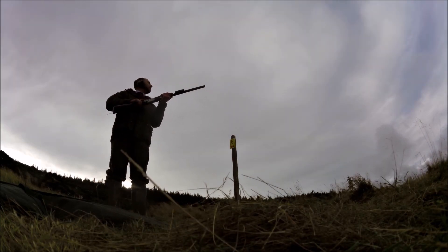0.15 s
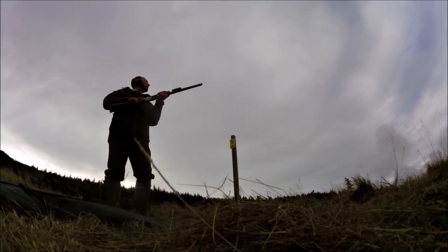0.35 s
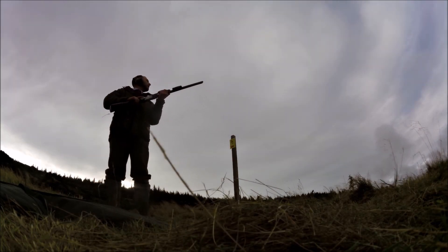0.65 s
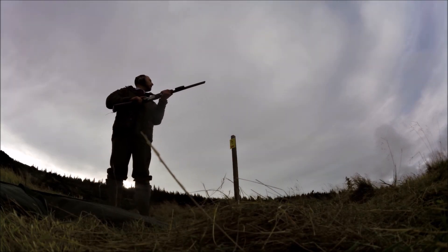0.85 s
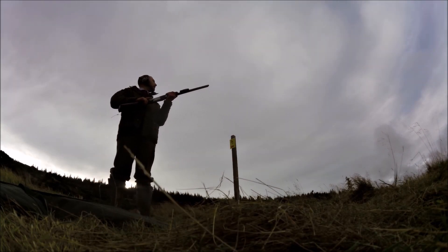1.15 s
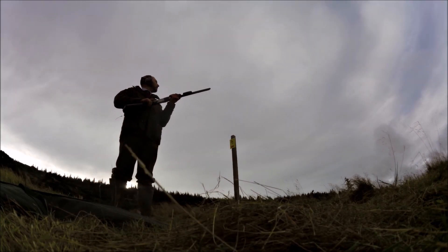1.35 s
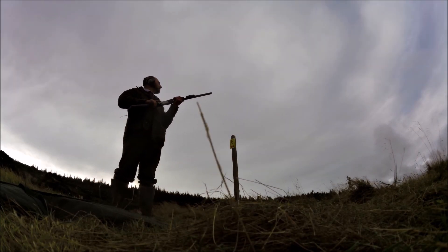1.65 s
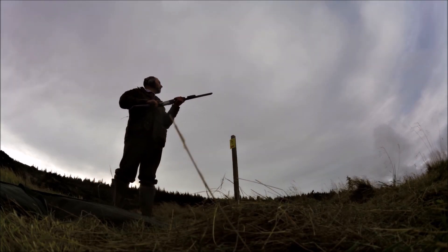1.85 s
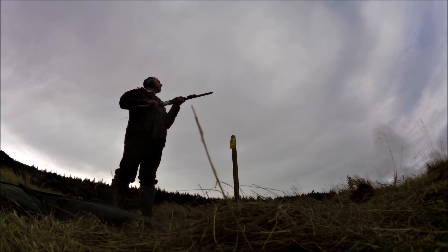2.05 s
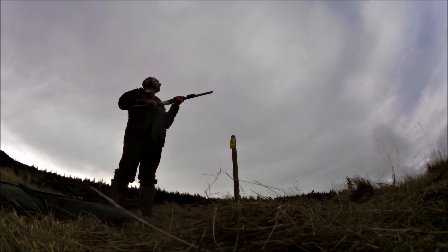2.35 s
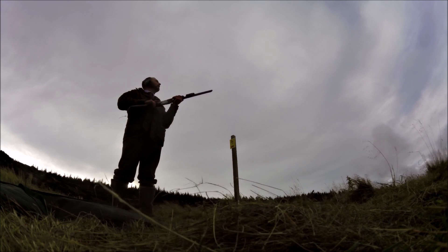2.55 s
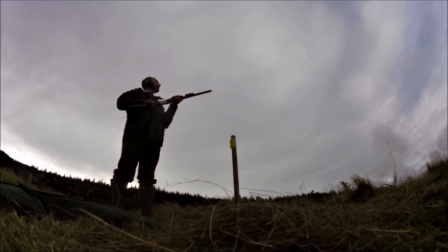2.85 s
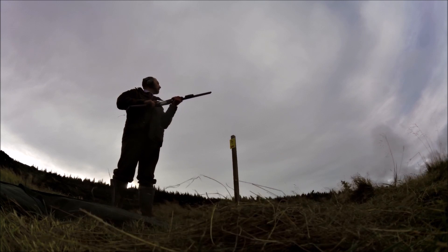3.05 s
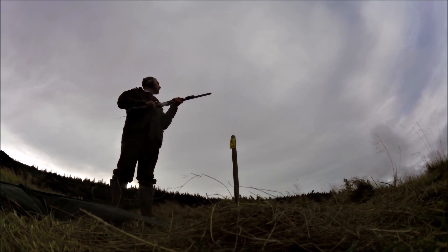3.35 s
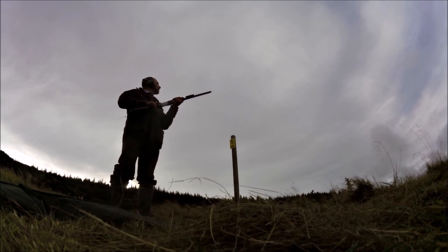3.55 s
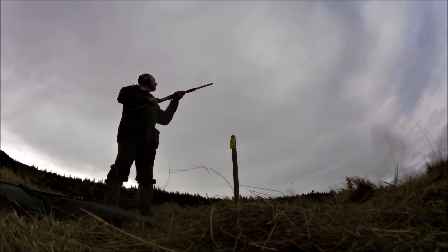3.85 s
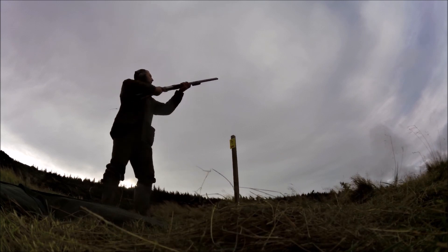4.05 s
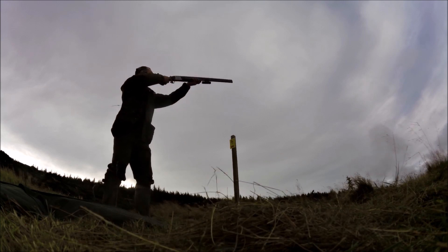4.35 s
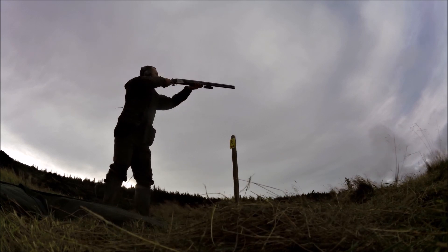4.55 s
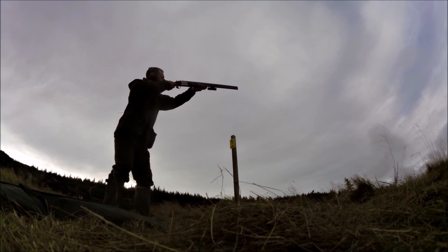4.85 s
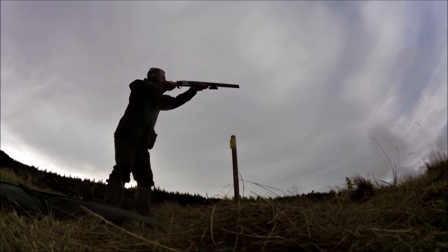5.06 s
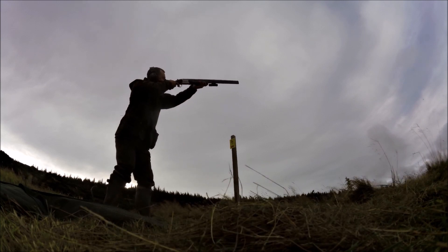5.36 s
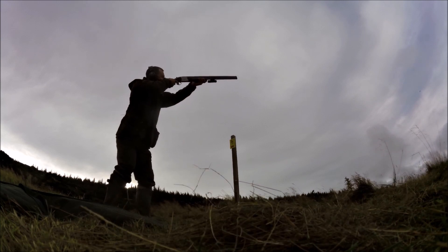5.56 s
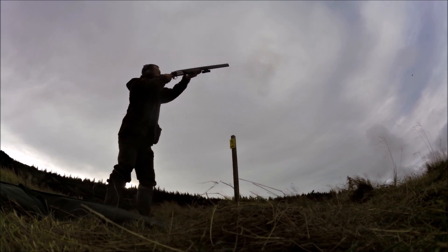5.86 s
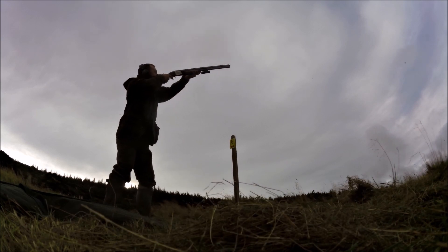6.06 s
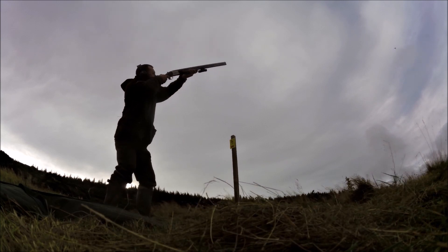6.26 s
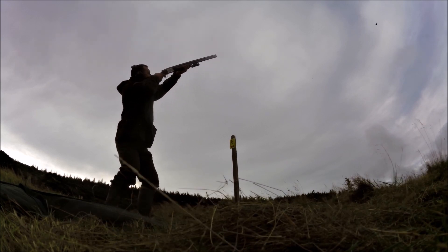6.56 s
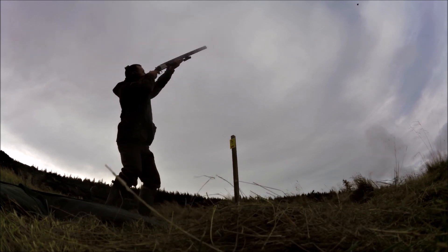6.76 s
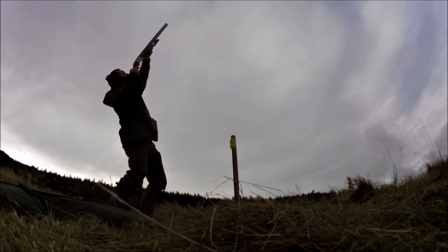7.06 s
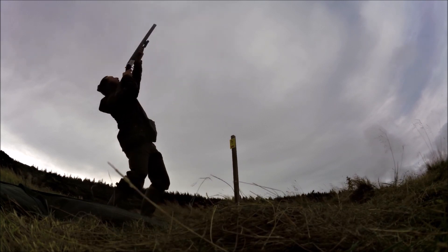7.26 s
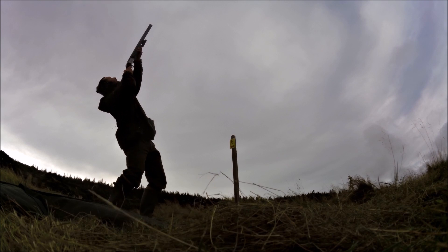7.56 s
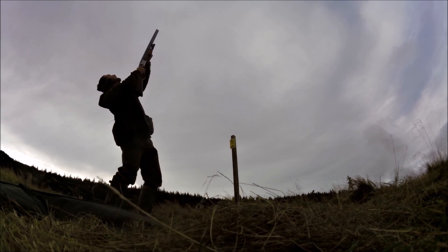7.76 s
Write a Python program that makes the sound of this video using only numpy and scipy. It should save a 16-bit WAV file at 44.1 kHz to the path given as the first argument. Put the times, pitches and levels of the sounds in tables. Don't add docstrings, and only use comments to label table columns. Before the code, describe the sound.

Wind thumps on a small microphone, then a dozen shotgun blasts fire in an uneven string on an open hillside, two very close and distorted.

```python
import sys
import numpy as np
from scipy import signal
from scipy.fft import rfft, irfft
from scipy.io import wavfile

SR = 44100
rng = np.random.default_rng(int(sys.argv[2]) if len(sys.argv) > 2 else 0)


def put_to_file(sound):
    columns = np.atleast_2d(sound).T
    safe = np.clip(columns, -1, 1)
    whole_steps = np.round(safe * 32767)
    wavfile.write(sys.argv[1], SR, whole_steps.astype(np.int16))


def convert_level_to_amplitude(level_db):
    exponent = np.asarray(level_db, float) / 20
    return 10 ** exponent


N = 348831
STEP = 32


def coloured(x, points):
    hz, level_db = np.transpose(points)
    grid_hz = np.maximum(np.arange(N // 2 + 1) * SR / N, 1)
    gain_db = np.interp(np.log(grid_hz), np.log(hz), level_db)
    y = irfft(rfft(x) * convert_level_to_amplitude(gain_db), N)
    return y / np.std(y)


def drift(rate_hz):
    r = np.exp(-2 * np.pi * rate_hz / SR)
    slow = signal.lfilter([1], [1, -2 * r, r * r], rng.standard_normal(N + SR))[SR:]
    return slow / np.std(slow)


def resonance(x, hz, width_hz):
    r = np.exp(-np.pi * width_hz / SR)
    zeros = np.array([1, 0, -1]) * (1 - r * r) / 2
    poles = [1, -2 * r * np.cos(2 * np.pi * hz / SR), r * r]
    return signal.lfilter(zeros, poles, x)


def narrow(x, hz, width_hz):
    return resonance(resonance(x, hz, width_hz), hz, width_hz)


def cut(x, hz, kind, order=2):
    return signal.sosfilt(signal.butter(order, hz, kind, fs=SR, output="sos"), x)


def add(out, at_s, piece):
    i = round(at_s * SR)
    out[i:i + len(piece)] += piece[:N - i]


def dying(noise, t60_s, rise_ms=0.35):
    t = np.arange(len(noise)) / SR
    return noise * (1 - np.exp(-1000 * t / rise_ms)) * convert_level_to_amplitude(-60 * t / t60_s)


def per_sample(power):
    return np.sqrt(np.interp(np.arange(N) / STEP, np.arange(len(power)), power))


def blast(length_ms):
    t = np.arange(SR // 20) / SR / (length_ms / 1000)
    return -(1 - t) * np.exp(-t)


# start_s, blast_db, blast_length_ms, crack_ahead_ms, crack_db
SHOTS = [(1.9825, 4.9, 1.03, 1.59, -5.6), (2.9596, -3.3, 2.26, 1.28, -10.5),
         (3.1916, -4.5, 0.56, 1.83, -4.3), (4.2382, -4.6, 0.55, 2.0, -3.6), (4.4562, 1.5, 0.3, 1.02, -30),
         (5.0475, -0.9, 1.32, 2.52, -0.7), (5.7245, -13.4, 0.73, 1.5, -0.9),
         (5.9082, -4.9, 0.4, 1.38, -11.6), (5.9345, 13.6, 0.55, 1.08, 10.6),
         (6.1579, -6.0, 1.75, 1.65, -10.0), (7.0613, 11.0, 0.51, 1.34, -2.5),
         (7.4077, -8.5, 0.96, 1.28, -8.1)]
# air_and_ground_cut_hz, bounce_after_ms, bounce_db, swing_db, swing_hz
GROUND = [(650, 7.19, -20.5, -0.1, 167), (1560, 1.99, 0.2, 10.5, 106), (2150, 5.61, -20.9, -1.7, 124),
          (2090, 5.5, -16.1, -1.6, 117), (500, 3.3, -2.1, -12.3, 111), (580, 3.36, -10.7, -7.2, 104),
          (1990, 2.01, -6.4, 3.9, 90), (850, 2.85, -10.5, -12.0, 92), (730, 7.37, -12.0, -3.3, 163),
          (1680, 6.08, -11.6, 8.8, 153), (3400, 3.94, -4.9, -3.2, 171), (1880, 1.61, -15.3, 4.8, 147)]


def pressure_fronts():
    out = np.zeros(N)
    t = np.arange(SR // 10) / SR
    swing_rise_s, swing_t60_s = .003, .04
    swell = (1 - np.exp(-t / swing_rise_s)) * convert_level_to_amplitude(-60 * t / swing_t60_s - 5)
    for shot, ground in zip(SHOTS, GROUND):
        start_s, blast_db, length_ms, ahead_ms, crack_db = shot
        air_hz, bounce_ms, bounce_db, swing_db, swing_hz = ground
        fronts = [(-ahead_ms, crack_db, .53), (0, 0, 1), (bounce_ms, bounce_db, 1.55)]
        for after_ms, level_db, stretch in fronts:
            front = cut(blast(stretch * length_ms), air_hz, "low")
            add(out, start_s + after_ms / 1000, convert_level_to_amplitude(blast_db + level_db) * front)
        add(out, start_s, convert_level_to_amplitude(blast_db + swing_db) * swell * np.sin(2 * np.pi * swing_hz * t))
    return out


# boom_db, grass_db, grass_t60_s, bank_after_ms, bank_db
SURROUNDS = [(-25.5, -2, 0.078, 11.5, -14), (-24, -8.5, 0.079, 7.8, -12.5), (-27.5, -11.5, 0.061, 7.3, -19),
             (-28.5, -15, 0.086, 10, -26), (-22.5, -14.5, 0.1, 14, -30), (-22.5, -14.5, 0.062, 7, -24),
             (-33, -22.5, 0.13, 3.7, -21.5), (-39.5, -17, 0.034, 13, -23), (-3.5, 1, 0.13, 5.3, 7.5),
             (-19.5, -15.5, 0.083, 13, -49), (-7, -3.5, 0.16, 5.3, 5), (-26.5, -9, 0.046, 11, -27)]


def booms():
    out = np.zeros(N)
    t = np.arange(SR // 10) / SR
    boom_hz, boom_t60_s = 81, 0.08
    for shot, around in zip(SHOTS, SURROUNDS):
        add(out, shot[0] + 0.0032, convert_level_to_amplitude(around[0] - 60 * t / boom_t60_s) * np.sin(2 * np.pi * boom_hz * t))
    return out


def near_scatter():
    out = np.zeros(N)
    split_hz, treble_share = 1050, 0.32
    noise = rng.standard_normal((len(SHOTS), 2, SR // 2))
    for shot, around, (grass, bank) in zip(SHOTS, SURROUNDS, noise):
        _, grass_db, t60_s, bank_ms, bank_db = around
        low = dying(cut(grass, split_hz, "low"), t60_s)
        high = dying(cut(grass, split_hz, "high"), treble_share * t60_s)
        add(out, shot[0] + 0.002, convert_level_to_amplitude(grass_db) * (low + high))
        add(out, shot[0] + bank_ms / 1000, convert_level_to_amplitude(bank_db) * dying(bank, 0.049))
    return out


# start_s, level_db
THUDS = [
    (5.9312, -15),
    (7.0568, -15),
]


def thuds():
    out = np.zeros(N)
    for start_s, level_db in THUDS:
        knock = blast(1.0) + dying(rng.standard_normal(SR // 20), 0.0058)
        add(out, start_s, convert_level_to_amplitude(level_db) * cut(knock, 3900, "low"))
    return out


# start_s, peak_db, t60_s, cut_hz
SLAPS = [(2.063, -19.5, 0.042, 2190), (2.114, -27.5, 0.068, 2500), (2.126, -17, 0.041, 900),
         (3.164, -32, 0.032, 1200), (3.291, -29, 0.042, 2210), (3.351, -25, 0.045, 604),
         (4.634, -24, 0.087, 1000), (4.673, -19, 0.025, 1300), (4.820, -25, 0.037, 1500),
         (6.044, -29, 0.061, 2220), (7.235, -24, 0.05, 1300), (7.474, -24.5, 0.045, 1480),
         (7.532, -24.5, 0.18, 1830)]


def slaps():
    out = np.zeros(N)
    for start_s, peak_db, t60_s, cut_hz in SLAPS:
        slap = dying(rng.standard_normal(SR // 5), t60_s, rise_ms=3.3)
        add(out, start_s, convert_level_to_amplitude(peak_db + 5) * cut(slap, cut_hz, "low"))
    return out


# centre_hz, width_hz, level_db
BOX = [
    (462, 308, 5.4),
    (1330, 120, -6),
    (2200, 260, 0),
]


def shots():
    direct = pressure_fronts() + booms() + thuds()
    scatter = near_scatter() + slaps()
    scatter = cut(scatter, 467, "low", order=1)
    scatter = cut(cut(scatter, 3500, "low"), 89, "high")
    heard = direct + scatter
    ringing = sum(convert_level_to_amplitude(level_db) * resonance(heard, hz, width_hz) for hz, width_hz, level_db in BOX)
    return cut(.6 * heard + ringing, 3800, "low")


# start_s, level_db, pitch_hz
SNAPS = [(1.983, -9.5, 1420), (1.981, -16, 2500), (2.959, -14.5, 2560), (3.192, -31, 4260),
         (4.237, -29.5, 4050), (5.046, -14.5, 1360), (5.046, -39, 2300), (5.908, -23, 2120),
         (5.907, -43, 3960), (5.933, -0.5, 3000), (6.158, -21, 1090), (6.157, -14, 2000), (7.060, 0, 2845),
         (7.061, 2.5, 1125), (5.936, 9, 1100), (2.960, -9.5, 1040)]


def snaps():
    out = np.zeros(N)
    for start_s, level_db, pitch_hz in SNAPS:
        burst = dying(np.sign(rng.standard_normal(SR // 25)), 0.015, rise_ms=0.25)
        add(out, start_s, convert_level_to_amplitude(level_db + 11) * narrow(burst, pitch_hz, 450))
    return cut(out, 7000, "low")


def tick():
    out = np.zeros(N)
    start_s, level_db = 1.9836, -25
    out[round(start_s * SR)] = convert_level_to_amplitude(level_db)
    return cut(out, 6000, "high")


# start_s, level_db, t60_s
RUSTLES = [
    (5.938, -35, 0.37),
    (7.064, -31.5, 0.31),
    (7.254, -45, 0.067),
]


def rustles():
    out = np.zeros(N)
    for start_s, level_db, t60_s in RUSTLES:
        add(out, start_s, convert_level_to_amplitude(level_db) * dying(rng.standard_normal(SR // 2), t60_s))
    return cut(cut(out, 1700, "high"), 3700, "low", order=4)


ROLL_FALL_DB = 15


def roll(start_s, lasts_s, fall_db=ROLL_FALL_DB):
    rise_s, hold_share = 0.0084, 0.18
    t = np.arange(0, N, STEP) / SR - start_s
    fall = convert_level_to_amplitude(-2 * fall_db * np.maximum(t / lasts_s - hold_share, 0))
    return np.clip(t / rise_s, 0, 1) ** 2 * fall


# freq_hz, level_db_per_hz
ROAR_COLOUR = [(88, -45), (150, -12.5), (335, -2.5), (648, 1), (737, -5), (786, -4.5), (1030, -13.5),
               (1190, -17), (1760, -19), (2160, -22), (2540, -34.5), (3130, -36), (7000, -55.5),
               (9100, -107), (15400, -120)]
# start_s, level_db, lasts_s, treble_rel_db, deep_rel_db
ROLLS = [(2.012, -43, 0.089, -10.5, -1), (2.13, -47, 0.11, -6, 1.5), (2.194, -44.5, 0.57, -12, -4),
         (2.430, -60.5, 0.71, -18, -7), (2.977, -51.5, 0.13, -6.5, -0.5), (3.213, -57, 0.45, -3.5, 5),
         (3.379, -49, 0.67, -9, 2), (3.913, -50.5, 0.88, -7, 5), (4.258, -59, 0.16, -12, 3),
         (4.490, -59.5, 0.6, -9, -3), (4.682, -47.5, 0.076, -11, -1.5), (4.772, -44.5, 1, -11, 3),
         (5.07, -57, 0.46, -1, 2.5), (5.293, -56.5, 0.3, -9, 5), (5.74, -51.5, 0.13, -7, 7.5),
         (5.99, -43.5, 0.39, -6, 6), (6.185, -38, 0.53, -11.5, -3.5), (6.287, -41.5, 0.39, -9.5, 2.5),
         (6.815, -51, 0.81, -8, -1.5), (7.100, -50, 0.1, -5, 5), (7.195, -53, 0.23, -21, 1),
         (7.414, -55, 0.3, -3, 4.5), (7.59, -40, 0.43, -8, -1), (7.654, -39, 0.11, -22, -5)]
# start_s, level_db, lasts_s, pitch_hz
BANDS = [(2.082, -69, 0.21, 3520), (2.193, -63, 0.25, 2620), (2.194, -56, 0.56, 1357),
         (3.404, -67.5, 0.16, 2530), (3.389, -50.5, 0.19, 302), (6.005, -42.5, .15, 256),
         (3.937, -58.5, 0.21, 1560), (4.958, -57, 0.28, 1490), (6.196, -60.5, 0.36, 2100),
         (7.603, -63.5, 0.26, 2384), (7.603, -55.5, 0.25, 1620)]


def roar():
    sizes = rng.standard_normal(N) * (rng.random(N) < 9000 / SR)
    echoes = coloured(sizes * convert_level_to_amplitude(1.1 * drift(30)), ROAR_COLOUR)
    deep = cut(echoes, 478, "low", order=4)
    middle = cut(cut(echoes, 475, "high", order=4), 758, "low", order=4)
    treble = cut(echoes, 1026, "high", order=4)
    treble = treble + 0.67 * resonance(treble, 1230, 540) + 2.86 * resonance(treble, 2570, 210)

    treble_fall_db = ROLL_FALL_DB - 1
    powers = []
    for start_s, level_db, lasts_s, treble_db, deep_db in ROLLS:
        shape = roll(start_s, lasts_s)
        treble_shape = roll(start_s, lasts_s, treble_fall_db)
        powers.append([convert_level_to_amplitude(2 * level_db) * shape,
                       convert_level_to_amplitude(2 * (level_db + deep_db)) * shape,
                       convert_level_to_amplitude(2 * (level_db + treble_db)) * treble_shape])
    powers = np.array(powers)
    total = powers.sum(axis=0)
    out = sum(per_sample(p) * layer / np.std(layer) for p, layer in zip(total, [middle, deep, treble]))

    first = per_sample(powers[:4, 2].sum(axis=0))
    share = 0.66 * first / (per_sample(total[2]) + 1e-9)
    dip = share * resonance(out, 1016, 350)
    for start_s, level_db, lasts_s, pitch_hz in BANDS:
        band = narrow(sizes, pitch_hz, .26 * pitch_hz)
        out += convert_level_to_amplitude(level_db) * per_sample(roll(start_s, lasts_s)) * band / np.std(band)
    return out - dip


# peak_s, level_db, half_width_s
GUSTS = [(.115, -55.5, .07), (.247, -42, 0.022), (0.303, -39.5, 0.027), (.362, -47, 0.013),
         (.442, -50, 0.059), (0.544, -44, 0.03), (.640, -61.5, .04), (0.996, -49, 0.019),
         (1.070, -51, 0.074), (1.230, -70, .06), (1.410, -66, .03), (2.340, -56, .03), (2.440, -43, 0.027),
         (2.505, -44, 0.053), (2.735, -45.5, .07), (2.888, -50, 0.02), (3.570, -51.5, 0.056),
         (3.715, -54, 0.049), (3.825, -52, 0.062), (4.685, -53, 0.037), (4.850, -54, 0.081),
         (6.960, -54.5, 0.052), (5.620, -50, 0.13), (5.815, -44.5, 0.09), (6.300, -42.5, 0.026),
         (6.470, -36.5, 0.048), (6.690, -54, 0.062), (7.320, -51, 0.026), (7.553, -40.5, 0.02),
         (7.800, -55.5, .06)]
# time_s, level_db
BREEZE = [(0, -66), (.62, -71.5), (1.9, -76), (2.2, -59), (4.0, -67.5), (5.3, -73.5), (6.8, -57),
          (7.9, -61.5)]
# freq_hz, level_db_per_hz
GUST_COLOUR = [(15, -43), (25, -22), (42, -4.5), (108, 6.5), (279, 1), (474, -24.5), (576, -23.5),
               (700, -35), (910, -63.5), (1540, -120)]


def gusts():
    edge_db = 8.5
    shake_db, shake_fall_db_per_s, shake_after_s = -21, 104, 0.014
    t = np.arange(0, N, STEP) / SR
    power = convert_level_to_amplitude(2 * np.interp(t, *np.transpose(BREEZE)))
    for peak_s, level_db, half_width_s in GUSTS:
        power = power + convert_level_to_amplitude(2 * (level_db - edge_db * ((t - peak_s) / half_width_s) ** 2))
    for shot, around in zip(SHOTS, SURROUNDS):
        since_s = np.maximum(t - shot[0], 0)
        rise = np.minimum(since_s / shake_after_s, 1) ** 2
        power = power + rise * convert_level_to_amplitude(2 * (around[0] + shake_db - shake_fall_db_per_s * since_s))
    lumps = per_sample(power) * convert_level_to_amplitude(1.0 + 2.5 * drift(33))
    eddies = coloured(rng.standard_normal(N), GUST_COLOUR)
    reach = np.minimum(lumps / convert_level_to_amplitude(-44.5), 3)
    return lumps * (eddies + reach * cut(eddies, 300, "high"))


# freq_hz, level_db_per_hz
HISS_COLOUR = [(15, -26.5), (25, 1), (134, -0.5), (476, -3), (560, -3.5), (641, -8), (734, -7), (936, -9.5),
               (2350, -12), (16000, -37.5)]


def hiss():
    return convert_level_to_amplitude(-63) * coloured(rng.standard_normal(N), HISS_COLOUR)


def scene():
    guns = shots() + snaps() + tick() + rustles()
    return (guns + roar() + gusts() + hiss())[None]


def low_pass(x):
    return signal.sosfilt(signal.butter(12, 16300, fs=SR, output="sos"), x)


def record(dry):
    ceiling, rumble_cut_hz, sag_hz, top_hz = .71, 45, 25, 4800
    hot = cut(dry, rumble_cut_hz, "high", order=1)
    clipped = hot / (1 + np.abs(hot / ceiling) ** 40) ** (1 / 40)
    sagged = cut(clipped, sag_hz, "high", order=1)
    return low_pass(cut(sagged, top_hz, "low", order=1))


dry = scene()
out = record(dry)
put_to_file(out)
```